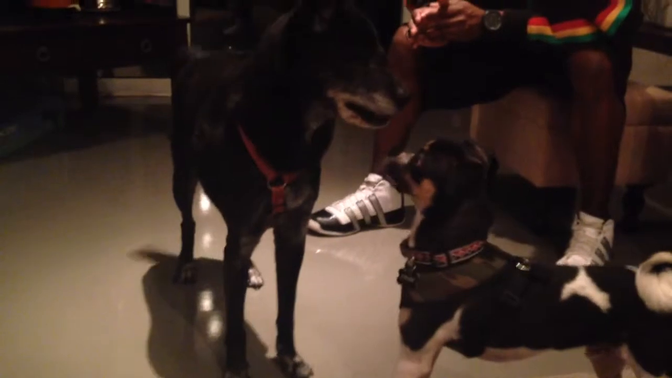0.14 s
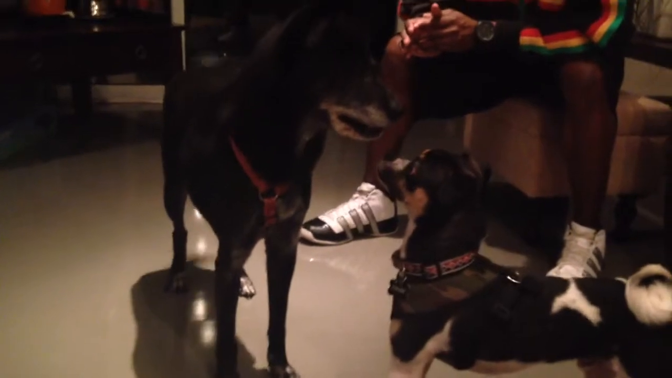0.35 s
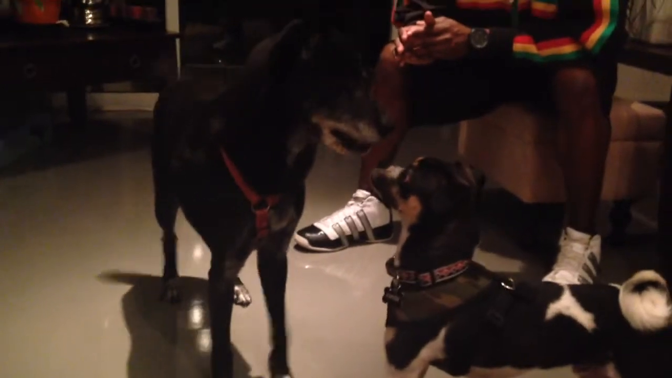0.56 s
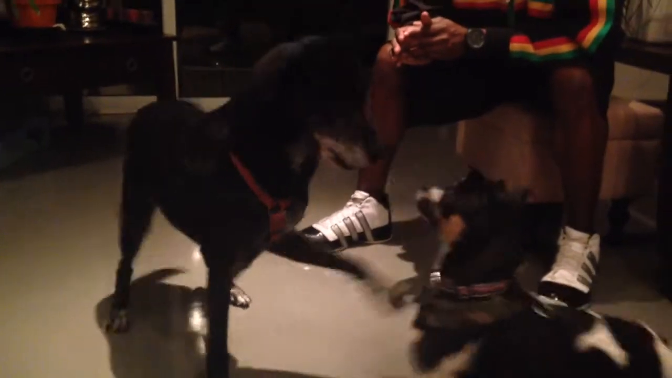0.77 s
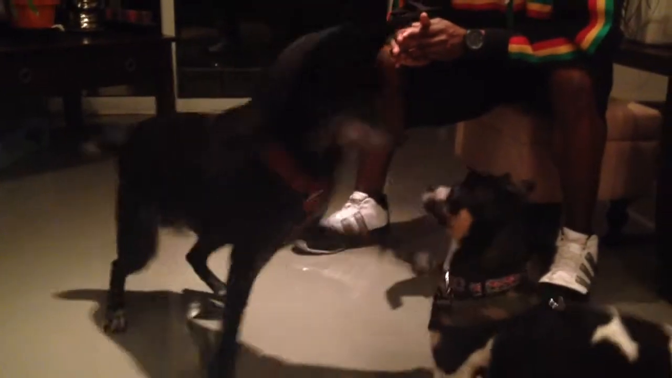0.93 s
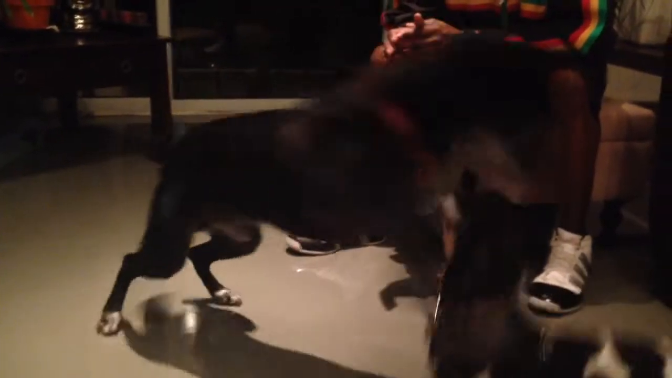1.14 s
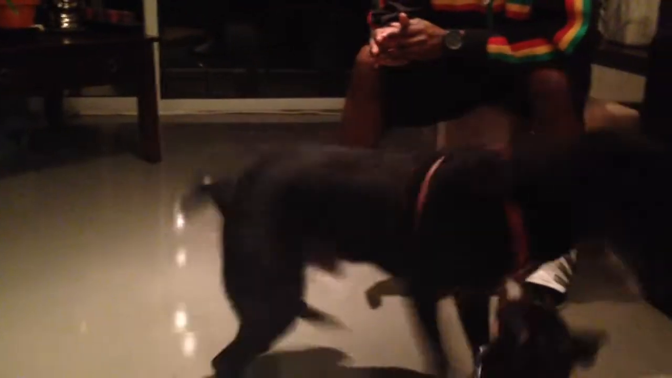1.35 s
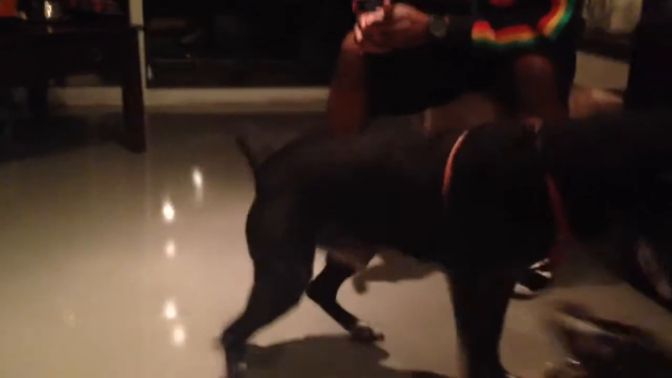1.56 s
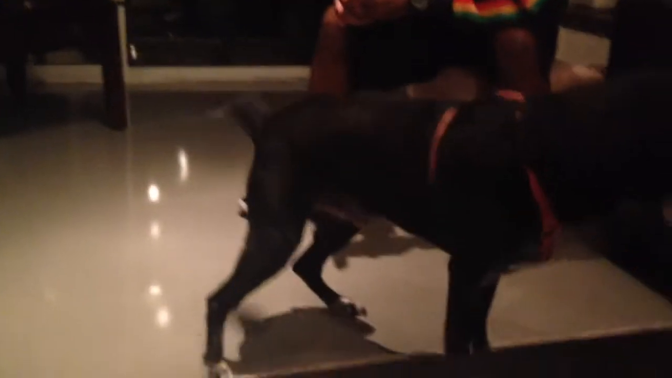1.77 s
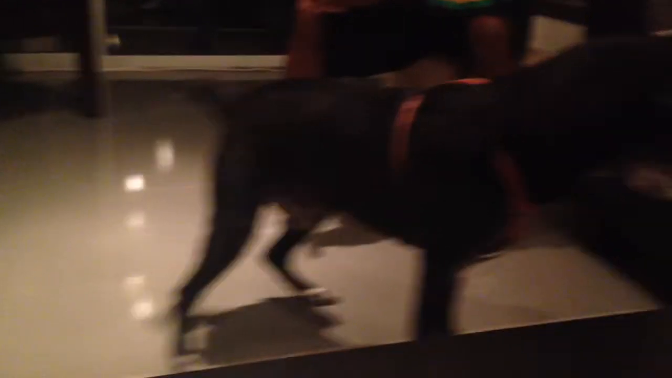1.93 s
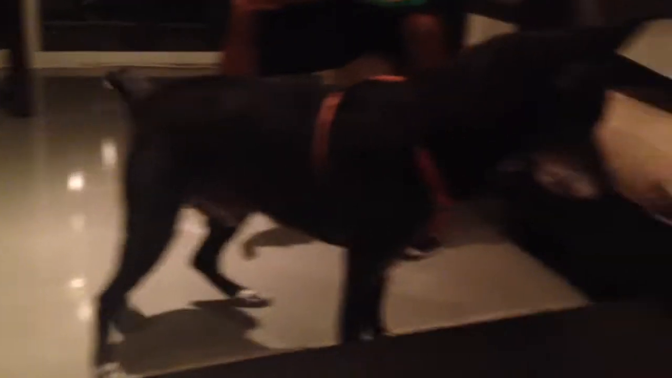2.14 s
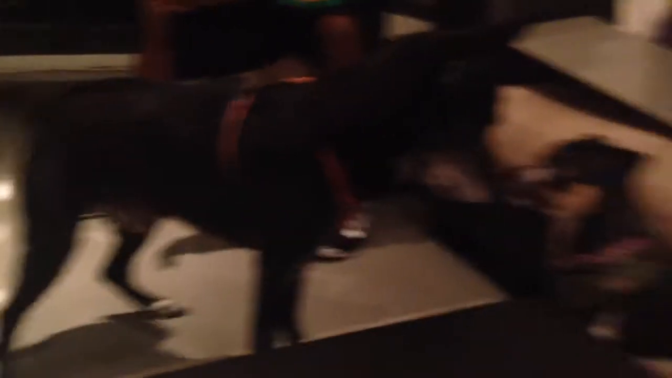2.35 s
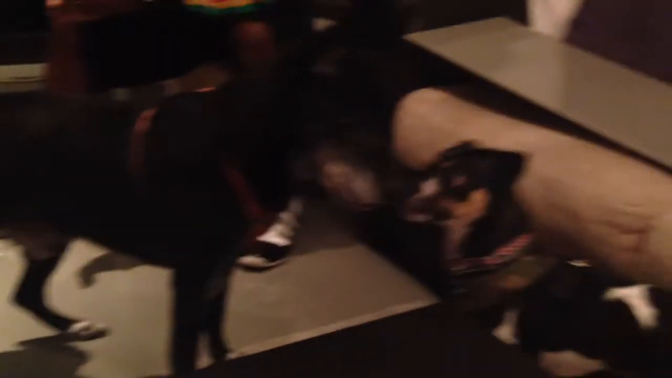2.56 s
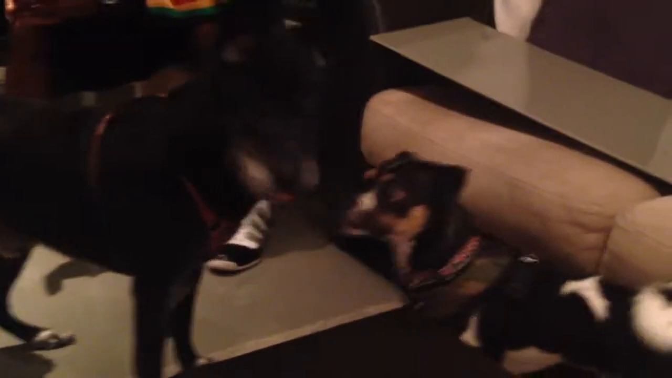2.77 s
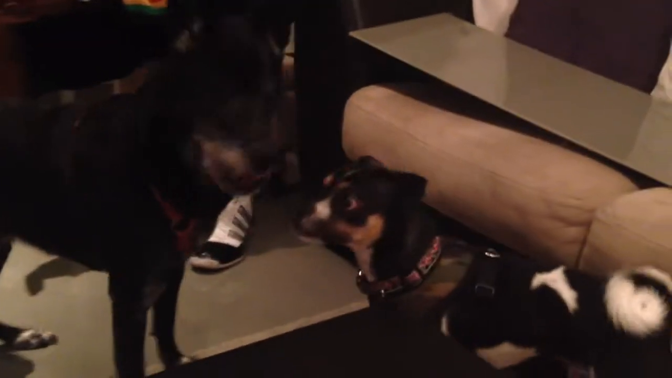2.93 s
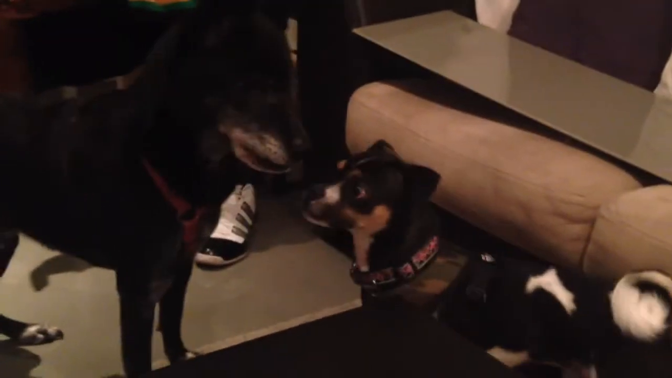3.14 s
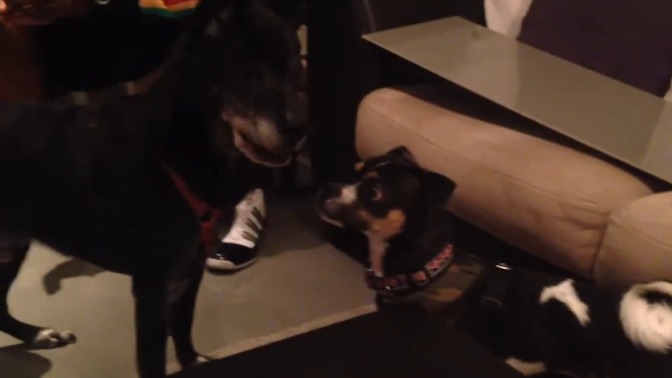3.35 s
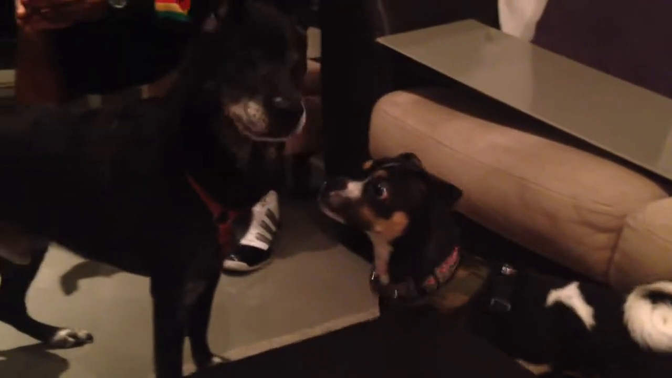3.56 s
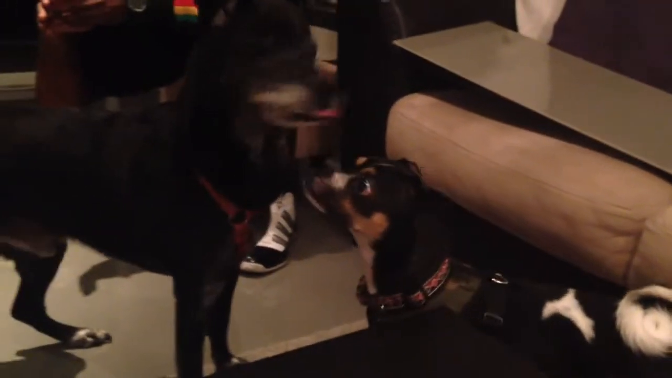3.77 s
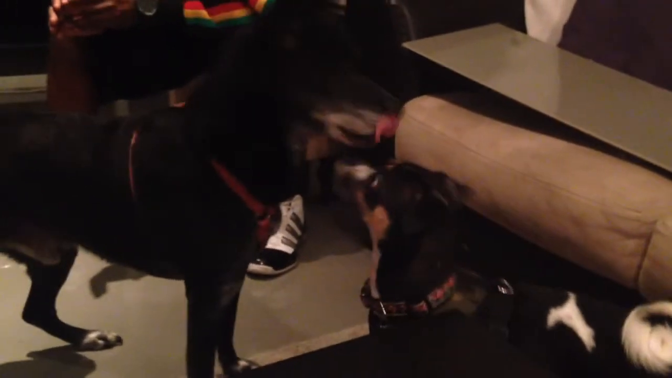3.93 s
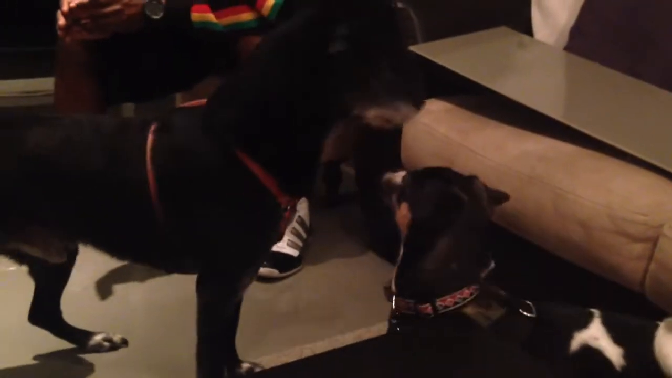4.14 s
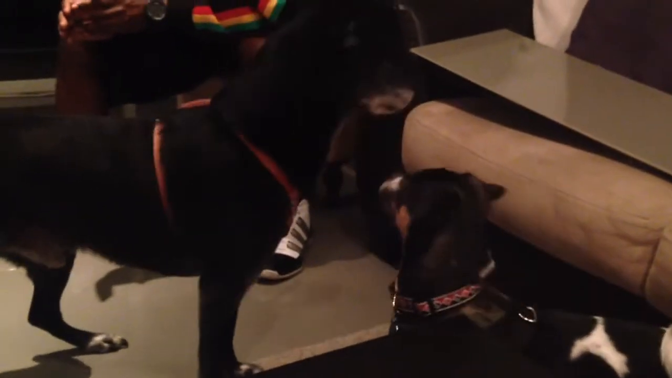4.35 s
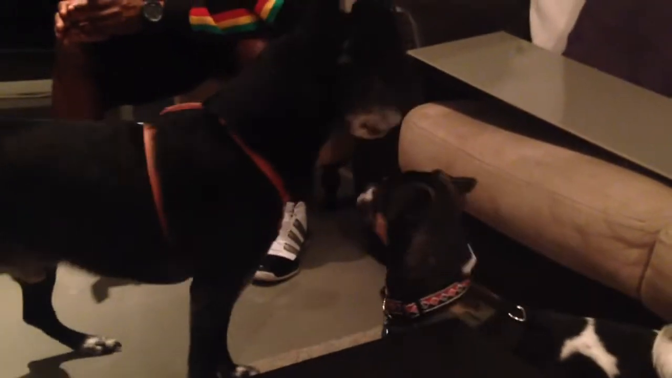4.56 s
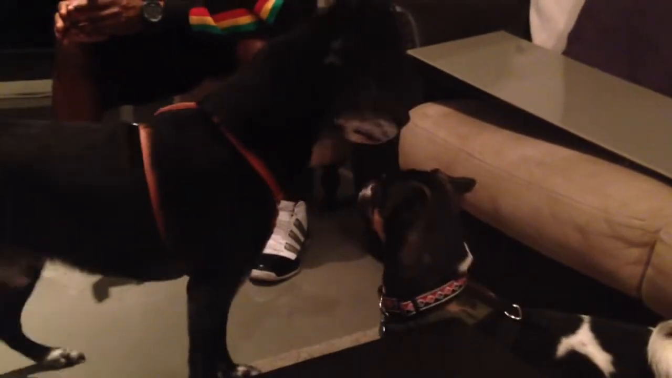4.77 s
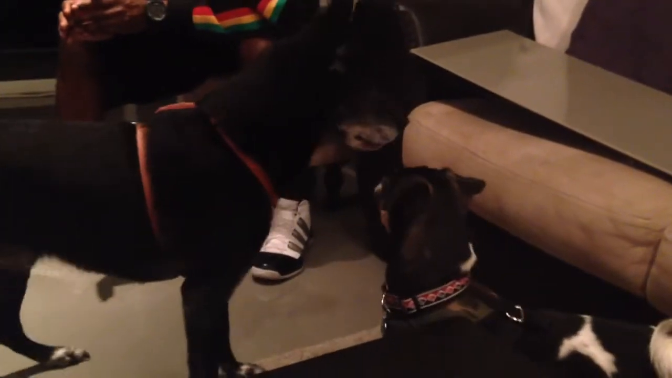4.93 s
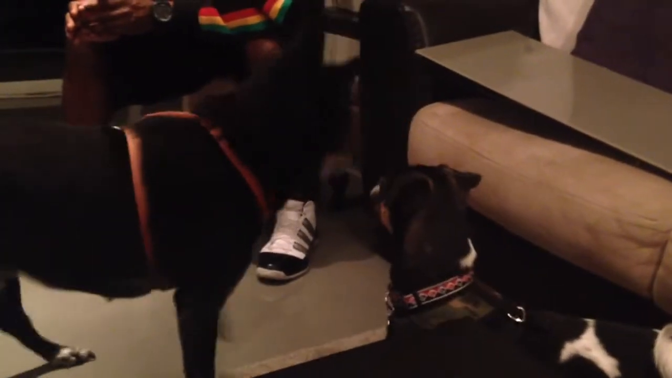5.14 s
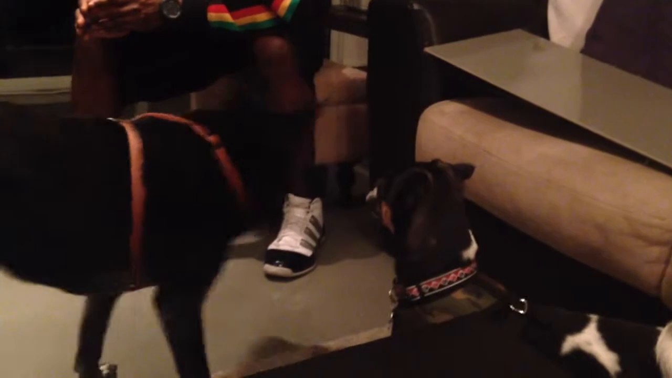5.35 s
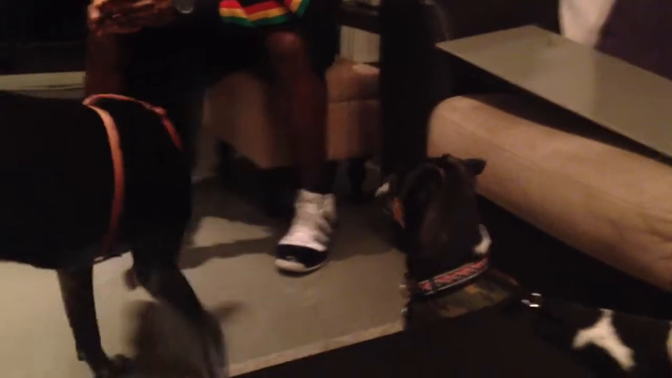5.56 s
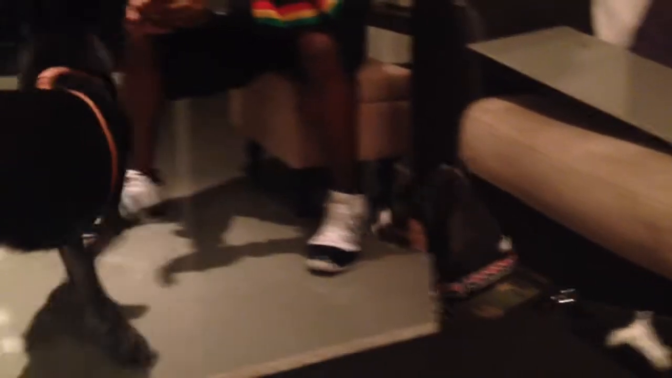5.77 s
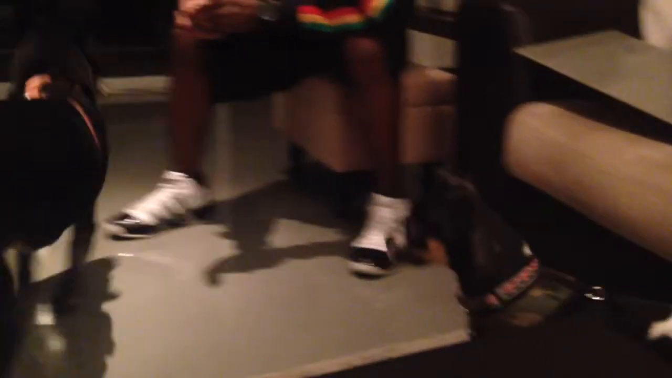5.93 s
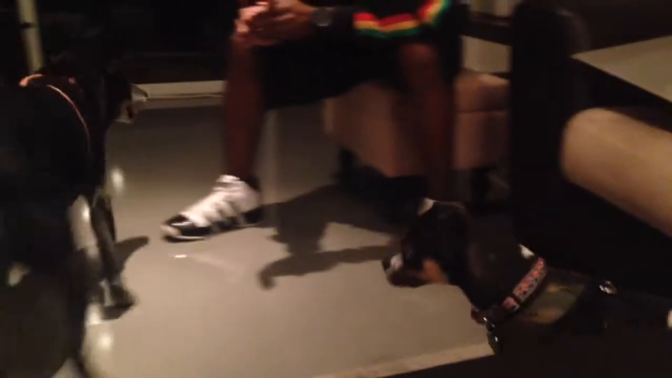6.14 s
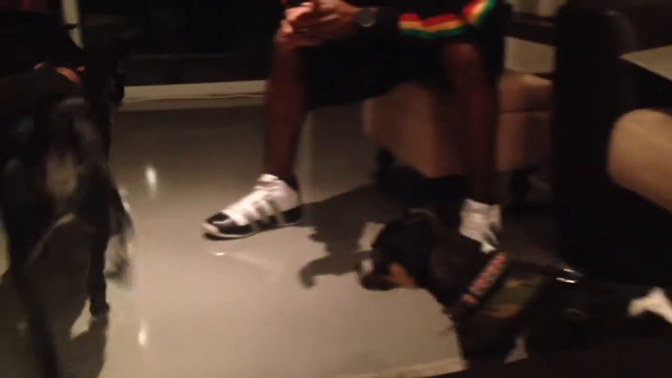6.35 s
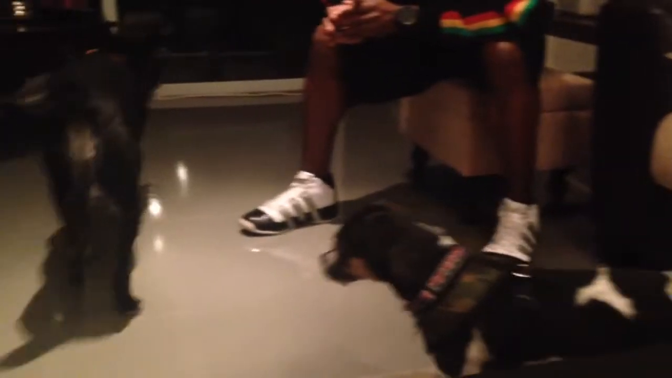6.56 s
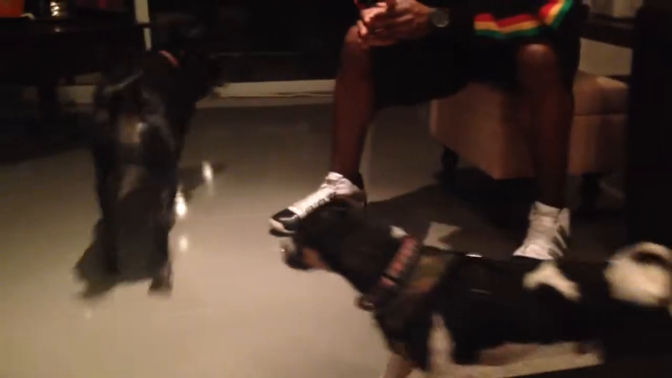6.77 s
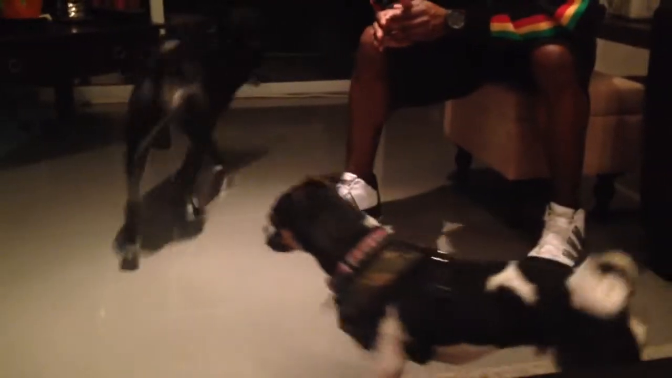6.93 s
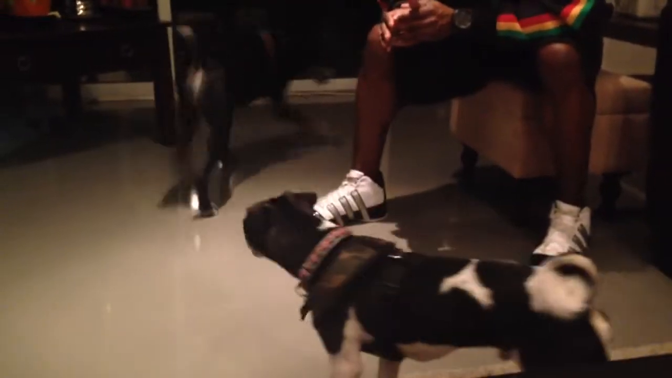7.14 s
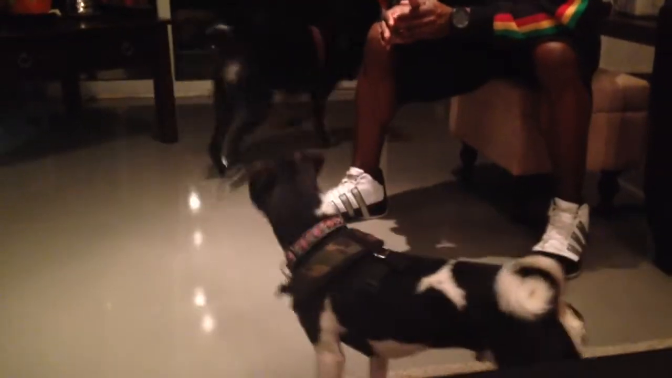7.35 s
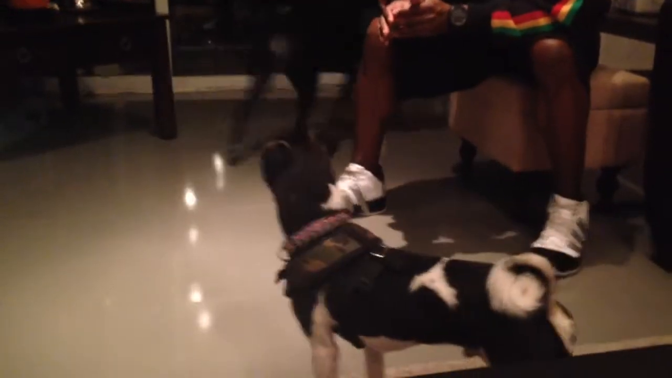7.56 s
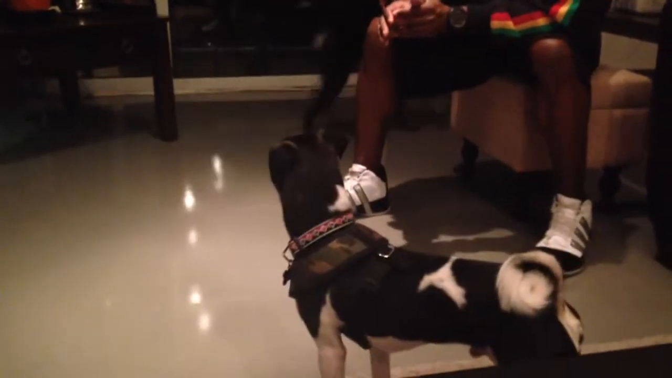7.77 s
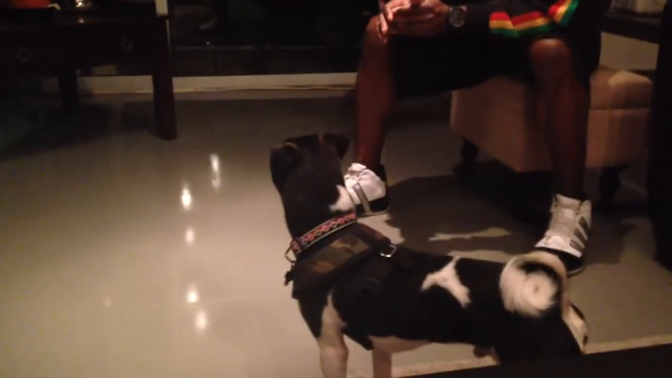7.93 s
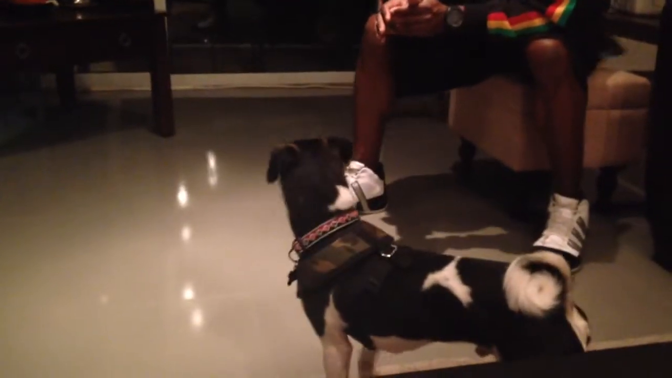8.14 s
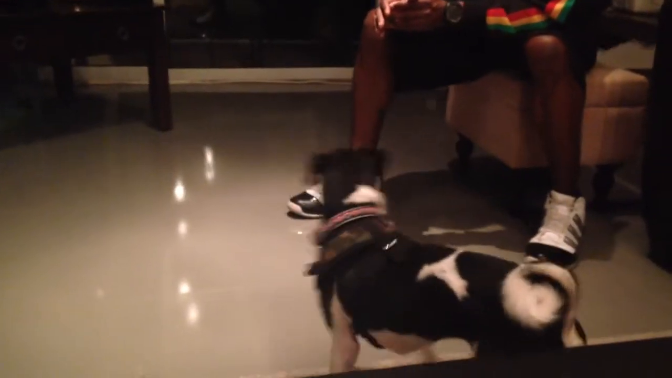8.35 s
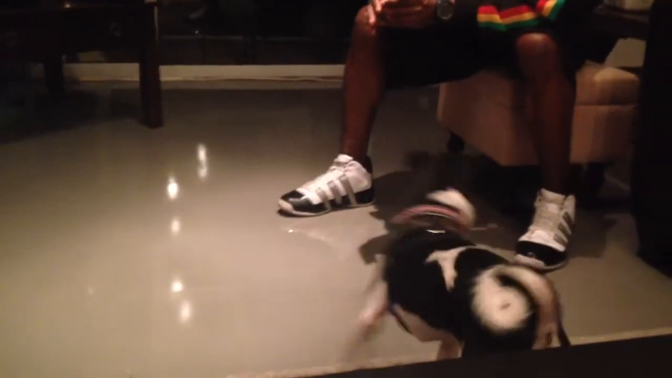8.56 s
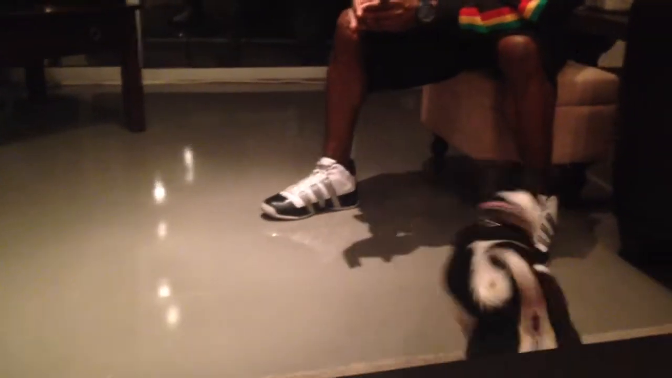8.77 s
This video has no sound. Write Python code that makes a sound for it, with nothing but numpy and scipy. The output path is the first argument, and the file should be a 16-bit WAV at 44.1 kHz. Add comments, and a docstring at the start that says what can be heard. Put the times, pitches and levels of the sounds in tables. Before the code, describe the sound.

Two dogs scuffle on a hard polished floor in an echoing room: claw clicks, low thuds, collar jingles, thin nose whines, brief hoarse huffs.

```python
"""An echoing room with a hard, polished floor, where two dogs scuffle near a hissy microphone.
Claws swell at their own pitch and tick, claws and pads skid in uneven slips, and pads thud with low bursts.
Metal modes ring in a near and a far collar, broken puffs make hoarse huffs, gliding near-pure tones
make thin nose whines, and a throbbing tone hoots. Sparse decaying reflections carry them round the room."""
import sys
import numpy as np
from scipy import signal
from scipy.io import wavfile
from scipy.ndimage import uniform_filter1d

SR = 44100
rng = np.random.default_rng(int(sys.argv[2]) if len(sys.argv) > 2 else 0)


def waveform_to_disk(signal):
    """Save audio, clipped to [-1, 1], as 16-bit WAV at the path in sys.argv[1]."""
    frames = np.transpose(np.atleast_2d(signal))
    scaled = np.clip(frames, -1, 1) * 32767
    samples = np.round(scaled).astype(np.int16)
    wavfile.write(sys.argv[1], SR, samples)


N = 388080  # samples


def gain_of(db):
    """Decibels to amplitude."""
    return 10 ** (np.asarray(db) / 20)


def evened(x):
    """Scales to rms 1."""
    return x / np.sqrt(np.mean(x ** 2) + 1e-20)


def drifting(noise, samples):
    """Smooths noise twice into a slow random drift of rms 1."""
    return evened(uniform_filter1d(uniform_filter1d(noise, samples), samples))


def read(points, hz):
    """Reads a table of (Hz, value) on a log-frequency axis."""
    f, value = np.transpose(points)
    return np.interp(np.log(hz + 1), np.log(f + 1), value)


def add(mix, s, sound):
    """Mixes a sound in at time s, in seconds."""
    part = mix[round(s * SR):][:len(sound)]
    part += sound[:len(part)]


def resonate(x, hz, width):
    """One damped resonance with a gain near 1 at its centre."""
    r = np.exp(-np.pi * width / SR)
    pole = r * np.exp(2j * np.pi * hz / SR)
    return 2 * signal.lfilter([1 - r], [1, -pole], x).real


def rasp(length, rate, resonances, taper=0.32):
    """Uneven clicks, at a given average rate per second, excite damped resonances for a short while."""
    chance, spread, sign = rng.random((3, SR // 4))[:, :round(length * SR)]
    size = gain_of(-1.3 * np.log(spread + 1e-9))
    slips = (sign - .5) * size * (chance < rate / SR)
    out = 0
    for hz, width, db in resonances:
        low_cut = signal.butter(2, 0.17 * hz, "high", fs=SR)  # thins out the low end below each resonance
        part = signal.lfilter(*low_cut, slips)
        part = resonate(resonate(part, hz, width), hz, 2 * width)
        damped_top = signal.butter(2, min(hz + 1.15 * width, .4 * SR), fs=SR)
        part = signal.lfilter(*damped_top, part)
        out = out + gain_of(db) * evened(part)
    return out * signal.windows.tukey(len(out), np.clip(taper, 0, 1))


# Hiss at the microphone. Each row: frequency in Hz, relative level in dB per Hz.
HISS_COLOUR = [(12, -41), (20, -28), (87, -1.5), (251, -6.5), (546, -4.5), (610, -6.5), (1260, -10.5),
               (1480, -10), (2190, -10.5), (2450, -8), (2660, -13.5), (3510, -9.5), (8300, -12),
               (14100, -12.5), (15300, -14)]
HISS_DB = -67.5  # rms


def hiss():
    """Microphone and room noise: coloured noise, nearly even, its level drifting a little in patches."""
    frames, hz = N // 256 + 5, np.fft.rfftfreq(1024, 1 / SR)
    real, imaginary, patches = rng.standard_normal((frames, 513, 3)).T
    patches = evened(uniform_filter1d(uniform_filter1d(patches, 14, 0), 12, 1))
    level_db = read(HISS_COLOUR, hz)[:, None] + 1.2 * patches
    spectrum = (real + 1j * imaginary) * gain_of(level_db)
    noise = signal.istft(spectrum, nperseg=1024, noverlap=768)[1][:N]
    return gain_of(HISS_DB) * evened(noise)


# How long the room rings, beneath the early boost.
# Each row: frequency in Hz, time to fall by 60 dB in seconds.
ROOM_DECAY = [(80, 0.23), (180, 0.39), (500, 0.85), (800, 0.72), (1700, 0.68), (4500, 0.58), (9000, 0.54),
              (14000, 0.23)]
ROOM_TURNS_PER_S = 3.1


def room(x, gap=.004, early_db=2.0, early_t60=0.15, uneven_db=3.0):
    """Sparse reflections, strong at first, each band dying at its own speed; three tails take turns."""
    out, turn = np.zeros(N), 2 * np.pi * ROOM_TURNS_PER_S * np.arange(N) / SR
    for k in range(3):
        taps = np.zeros(SR)
        at = np.arange(0, SR - 20, 20) + rng.integers(0, 20, (SR - 1) // 20)
        uneven = gain_of(uneven_db * rng.standard_normal(len(at)))
        taps[at] = rng.choice([-1., 1.], len(at)) * uneven
        hz, t, spectrum = signal.stft(taps, SR, nperseg=512)
        decay = gain_of(-60 * t / read(ROOM_DECAY, hz)[:, None])
        tail = signal.istft(spectrum * decay, SR, nperseg=512)[1]
        # near walls and furniture
        tail *= 1 + gain_of(early_db - 60 * np.arange(len(tail)) / SR / early_t60)
        share = np.sqrt(2 / 3) * np.cos(turn + k * np.pi / 3)  # the three powers add up to 1
        add(out, gap, signal.fftconvolve(x * share, tail / np.linalg.norm(tail))[:N])
    return out


# Hoots, one table each. Each row: time in seconds, pitch in Hz before the waver,
# level in dB before the throb and the end fades.
HOOT_CURVES = [
    [(6.586, 687, -56), (6.6, 671, -39), (6.614, 690, -39)],
    [(7.462, 754, -52), (7.485, 766, -35), (7.5, 769, -29), (7.528, 769.4, -28), (7.55, 763, -35.5),
     (7.567, 725, -44), (7.585, 770, -36), (7.605, 750, -33)],
    [(7.692, 773, -30), (7.705, 760, -23), (7.735, 751, -22), (7.752, 782, -32.5), (7.79, 749, -35),
     (7.812, 739, -53), (7.833, 727, -30.5), (7.845, 730, -48)],
]
HOOT_ROOM_DB, OVERTONES_DB = -10, -36
THROBS_PER_S, THROB_DEPTH = 37.4, 0.59  # depth as a share of amplitude


def hoots(wobble=0.017, third_db=6.5):
    """An almost pure tone that throbs evenly and wavers in pitch, with two faint partials."""
    out, drift = np.zeros(N), drifting(rng.standard_normal(N), 250)
    for rows, start in zip(HOOT_CURVES, rng.random(len(HOOT_CURVES))):
        s, hz, db = np.transpose(rows)
        t = np.arange(s[0], s[-1], 1 / SR)
        waver = 1 + wobble * drift[round(s[0] * SR):][:len(t)]
        angle = 2 * np.pi * (start + np.cumsum(np.interp(t, s, hz) * waver) / SR)
        partials = np.sin(1.94 * angle) + gain_of(third_db) * np.sin(3 * angle)
        tone = np.sin(angle) + gain_of(OVERTONES_DB) * partials
        throb = 1 - THROB_DEPTH * np.cos(np.pi * THROBS_PER_S * (t - s[0])) ** 2
        level = gain_of(np.interp(t, s, db)) * signal.windows.tukey(len(t), .1)
        add(out, s[0], level * throb * tone)
    return out, gain_of(HOOT_ROOM_DB) * out


# Whines through the nose, one table each. Each row: time in seconds, whistle pitch in Hz before
# the wobble, whistle level in dB rms before the flutter and the end fades.
WHINE_CURVES = [
    [(2.81, 6400, -73), (2.838, 6640, -57.5), (2.96, 6780, -57.5), (3.008, 7080, -64), (3.078, 7500, -59),
     (3.124, 7580, -48), (3.165, 7250, -55), (3.198, 7040, -54.5), (3.235, 6900, -65), (3.33, 6900, -72)],
    [(3.726, 5300, -68), (3.738, 5900, -63), (3.748, 6470, -71), (3.762, 6760, -60), (3.795, 6820, -68),
     (3.87, 7120, -57.5), (3.93, 7260, -62.5), (4.051, 7400, -63.5), (4.115, 7370, -68.5),
     (4.205, 6900, -70), (4.34, 6640, -79)],
    [(4.73, 6460, -77), (4.784, 6620, -70), (4.896, 6710, -69), (4.914, 6700, -61), (4.96, 6730, -71),
     (5.09, 6700, -79)],
    [(5.362, 6800, -70), (5.37, 7000, -54), (5.387, 6500, -60)],
    [(5.58, 6940, -70), (5.625, 7600, -77), (5.66, 7450, -80.5), (5.7, 7460, -71)],
]
# Air rushing with the whine. Each row: resonance in Hz, width in Hz of each of two passes,
# level in dB against the whistle when it is at the strain pitch.
RUSHING_AIR = [(4430, 950, -21), (5180, 1300, -17)]
STRAIN_HZ, STRAIN_DB_PER_KHZ = 7370, 3  # more air escapes as the whistle is pushed higher
OCTAVE_DB, WHINE_ROOM_DB = -20, -9.0


def whines(wobble=0.0033, flutter_db=1.0):
    """A nearly pure nose whistle that flutters, with a weak broken octave and some rushing air."""
    out = np.zeros(N)
    for rows in WHINE_CURVES:
        s, hz, db = np.transpose(rows)
        t = np.arange(s[0], s[-1], 1 / SR)
        pitch = np.interp(t, s, hz)
        air, jitter, flutter, breaks = rng.standard_normal((4, N // 8))
        flutter, breaks = drifting(flutter, 500)[:len(t)], drifting(breaks, 500)[:len(t)]
        jitter = evened(uniform_filter1d(jitter, 150))[:len(t)]
        angle = 2 * np.pi * np.cumsum(pitch * (1 + wobble * jitter)) / SR
        tone = gain_of(flutter_db * flutter) * np.sin(angle)
        tone += gain_of(4.6 * breaks + OCTAVE_DB) * np.sin(2 * angle)
        rush = np.zeros(len(t))
        for f, width, air_db in RUSHING_AIR:
            band = resonate(resonate(air, f, width), f, width)
            rush += gain_of(air_db) * evened(band)[:len(t)]
        rush *= gain_of(STRAIN_DB_PER_KHZ * (pitch - STRAIN_HZ) / 1000)
        level = gain_of(np.interp(t, s, db)) * signal.windows.tukey(len(t), .05)
        add(out, s[0], level * (np.sqrt(2) * tone + rush))
    return out, gain_of(WHINE_ROOM_DB) * out


# The dogs' hoarse huffs. Each row: start in seconds, length in seconds, level in dB,
# mouth opening as a factor on the throat's pitches, level of the upper two resonances in dB.
HUFF_EVENTS = [(6.147, 0.1, -71.5, 0.82, 3), (6.406, 0.045, -65, 1.08, -22), (6.612, 0.1, -55, 1.105, 3.5),
               (7.176, 0.11, -67.5, 0.92, -18), (7.413, 0.028, -65.5, 0.88, -22),
               (7.688, 0.15, -51, 0.98, 1), (7.841, 0.1, -74, 1.2, -18), (8.686, 0.15, -70.5, 1.14, 2)]
# The throat. Each row: resonance in Hz before the mouth factor, width in Hz, relative level in dB.
THROAT_RESONANCES = [(970, 580, -4), (1470, 420, 2.5), (2060, 940, 0), (2900, 3500, -0.5)]
PUFFS_PER_S, HUFF_ROOM_DB = 800, -3


def huffs():
    """Broken puffs of air through the throat, whose resonances rise as the mouth opens."""
    out = np.zeros(N)
    for s, length, db, mouth, upper_db in HUFF_EVENTS:
        throat = []
        for k, (hz, width, relative_db) in enumerate(THROAT_RESONANCES):
            throat.append((mouth * hz, width, db + relative_db + upper_db * (k > 1)))
        add(out, s, rasp(length, PUFFS_PER_S, throat, taper=0.45))
    return out, gain_of(HUFF_ROOM_DB) * out


# Levels of the collar tags hold before the brushing makes them ragged.
# Far collar. Each row: strike in seconds, level in dB, level of the second mode group in dB.
FAR_COLLAR_STRIKES = [(5.7144, -52, -9), (5.7394, -57.5, -9), (5.7972, -61.5, -4), (6.3121, -49.5, -17),
                      (7.1272, -58, 5), (7.1894, -50, -9), (7.4144, -52, -6), (7.428, -53.5, 1),
                      (7.7468, -41.5, -22), (7.7583, -36.5, -16), (7.8226, -43.5, -23), (7.8494, -50, -20)]
# Its mode groups, main then high. Each row: pitch in Hz, level in dB, time to fall 60 dB in seconds.
FAR_COLLAR_MODES = [
    [(6240, -16, 0.092), (6400, -5, 0.098)],
    [(7570, -7.5, 0.18), (7940, -5.5, 0.041)],
]
# Near collar. Each row: strike in seconds, level in dB, high group in dB, low group in dB.
NEAR_COLLAR_STRIKES = [(1.4427, -42, -17, -10), (1.4656, -53, -4.5, -5.5), (1.4833, -43, -4.5, 11),
                       (1.5244, -44, 10.5, 5), (1.5442, -46, 2, 3), (1.8956, -58, -3, 16),
                       (1.9144, -58, -1, 13), (2.0358, -35.5, -10, -24), (2.0644, -47, -11, -8),
                       (2.0713, -52, -6, -7), (2.0995, -62, -6, -10)]
# Its mode groups, main, high, low. Each row: pitch in Hz, level in dB, time to fall 60 dB in seconds.
NEAR_COLLAR_MODES = [
    [(3220, -22, 0.073), (9840, 1.5, 0.034), (10120, -14, 0.054)],
    [(11460, 4.5, 0.027), (11600, -17, 0.03), (14480, -10, 0.041)],
    [(3530, -11.5, 0.054), (6000, -4, 0.033)],
]


def tags(strikes, groups, room_db, tick_db=-8.0, tick_hz=8000, tick_s=0.00024):
    """Struck metal: a tick, and groups of modes whose strength depends on where the blow lands."""
    out, t = np.zeros(N), np.arange(SR // 2) / SR
    tick = (np.exp(-(t / tick_s - 2) ** 2) * np.sin(2 * np.pi * tick_hz * t))[:100]
    phases = rng.random((len(strikes), len(groups), 3))  # in turns
    for (s, db, *place), strike_phases in zip(strikes, phases):
        add(out, s, gain_of(db + tick_db) * tick)
        for modes, place_db, group_phases in zip(groups, [0, *place], strike_phases):
            for (hz, mode_db, t60), phase in zip(modes, group_phases):
                level = gain_of(db + mode_db + place_db - 60 * t / t60)
                add(out, s, level * np.sin(2 * np.pi * (hz * t + phase)))
    touch = drifting(rng.standard_normal(N), 120)
    out *= gain_of(6.1 * touch - 2.0)  # the tags brush each other, so the ring is ragged
    return out, gain_of(room_db) * out


# Paws sliding, and brief smeared claw clicks; the narrow ones squeak. Each row: start in seconds,
# length in seconds, level in dB rms before the end fades, scrape pitch in Hz, width in Hz.
SKID_EVENTS = [(1.237, 0.019, -47.5, 2830, 4880), (1.258, 0.007, -28, 4260, 2380),
               (1.269, 0.059, -53, 1600, 1480), (1.378, 0.058, -53.5, 5800, 6000),
               (1.393, 0.011, -43.5, 7700, 4000), (1.494, 0.0107, -35.5, 4050, 5170),
               (1.523, 0.031, -49, 3770, 4140), (1.587, 0.047, -54.5, 840, 265),
               (5.407, 0.049, -60, 2000, 1200), (5.421, 0.025, -42.5, 4500, 3900),
               (5.454, 0.022, -48, 4130, 2470), (5.865, 0.026, -61, 4070, 2980),
               (5.977, 0.005, -39.5, 4750, 3240), (6.609, 0.04, -50.5, 6160, 250),
               (6.617, 0.041, -56.5, 6780, 300), (6.789, 0.052, -79, 4500, 3500),
               (7.173, 0.022, -54.5, 2250, 304), (7.303, 0.11, -61, 4270, 2450),
               (7.967, 0.011, -46, 6750, 4840), (8.608, 0.022, -47, 5060, 3800)]
SKID_ROOM_DB = 1.5  # for skids of 30 ms and longer
SLIPS_PER_S, EXTRA_SLIPS = 500, 18  # a steady scrape; about this many more per skid, so brief ones are denser


def skids():
    """Uneven slips of claw and pad excite one scraping resonance; the briefest are heard mostly direct."""
    dry, wet = np.zeros((2, N))
    for s, length, db, hz, width in SKID_EVENTS:
        scrape = rasp(length, SLIPS_PER_S + EXTRA_SLIPS / length, [(hz, width, db)])
        add(dry, s, scrape)
        add(wet, s, gain_of(SKID_ROOM_DB) * min(length / .03, 1) * scrape)
    return dry, wet


# Pads and bodies landing. Each row: time in seconds, to which a short lag is added, level in dB,
# ring in Hz, room level in dB against the direct sound, knock level in dB against the thud.
THUD_EVENTS = [(0.449, -69, 640, 9, -17), (0.512, -62, 580, -4, -15), (0.691, -58, 592, 2.5, 2),
               (0.782, -42, 510, -0.5, -4), (1.043, -62, 510, -2, -5.5), (1.309, -44, 510, -0.5, -17),
               (1.357, -39, 410, 2, 1.5), (1.387, -23.5, 440, -4, -4), (1.389, -44, 140, -3, -20),
               (1.401, -35, 364, -1, -17), (1.492, -39, 502, 9.5, -12), (1.565, -23.5, 204, -3, -1),
               (1.59, -42, 180, -9, -15), (1.609, -32, 207, -7.5, -3), (1.739, -33.5, 189, -0.5, -5),
               (1.765, -41, 178, -4, -9.5), (1.828, -43, 219, -17, -16), (1.85, -52, 200, 3, -15),
               (2.453, -50.5, 1150, 0, -4), (2.902, -60, 513, 1, 13), (3.362, -60.5, 494, -3, 11),
               (3.802, -56, 790, -5, -15), (3.998, -64, 603, -10, -9), (4.125, -53.5, 943, -1.5, -15),
               (4.509, -57.5, 885, 3, -9), (4.764, -60, 500, 6, -1.5), (5.147, -60.5, 580, 2, -12),
               (5.341, -60.5, 800, -4, -12), (5.387, -39, 593, 2.5, -20), (5.405, -49, 274, 0, -19),
               (5.443, -40.5, 560, -3, -15), (5.652, -50, 484, 2, -8), (5.855, -51.5, 594, 1.5, -15),
               (5.947, -44, 506, 2, -12), (6.229, -42.5, 580, -0.5, -10), (6.244, -42, 594, -7.5, -15),
               (6.291, -54, 510, 1, -5.5), (6.47, -54, 410, 2, -6), (6.533, -61.5, 586, 8.5, -5.5),
               (6.759, -50, 540, 4, -14), (7.019, -49, 477, 11, -12), (7.046, -46.5, 483, -1, 8.5),
               (7.299, -50.5, 587, 0, -14), (7.311, -42, 520, -2, -14), (7.628, -44, 560, 9, -2),
               (8.241, -58.5, 390, 10, -9), (8.264, -41.5, 550, 0.5, 1.5), (8.57, -62, 554, 14.5, -17),
               (8.756, -59.5, 475, 5, 7.5)]
LONGEST_SQUASH_S, KNOCK_S, KNOCK_HZ = 0.0018, 0.00079, 705  # times to the envelope's peak


def thuds(lag=0.002025, soft=1.64):
    """A pad squashes, then pushes the floor for a cycle or two; bone and claw add a shorter knock above."""
    dry, wet, t = *np.zeros((2, N)), np.arange(3000) / SR
    knock_swell = (t / KNOCK_S * np.exp(1 - t / KNOCK_S)) ** soft
    knock = knock_swell * np.sin(2 * np.pi * KNOCK_HZ * t)
    for s, db, hz, room_db, knock_db in THUD_EVENTS:
        u = t / min(LONGEST_SQUASH_S, 1 / hz)
        push = (u * np.exp(1 - u)) ** soft * np.sin(2 * np.pi * hz * t)
        blow = push + gain_of(knock_db) * knock
        blow = signal.lfilter(*signal.butter(2, .4 * hz, "high", fs=SR), blow)  # the floor springs back
        add(dry, s + lag, gain_of(db) * blow)
        add(wet, s + lag, gain_of(db + room_db) * blow)
    return dry, wet


# Claw taps, near and far. Each row: start of the swell in seconds, level in dB, ring in Hz,
# room level in dB against the direct tick.
CLAW_TAPS = [(0.6736, -41.5, 4160, 13), (0.7868, -27, 4550, 3), (0.963, -48, 5300, -5),
             (1.242, -33, 3300, 3), (1.259, -12, 4760, 1.5), (1.2605, -16, 3290, -11),
             (1.3857, -37, 3970, 16), (1.494, -23, 4260, 12), (1.5662, -30.5, 2750, 1),
             (1.6724, -36.5, 3740, 9.5), (2.448, -46, 4400, 2), (3.114, -42, 5040, 0),
             (3.1892, -43, 5330, 4), (3.46, -40, 4080, 4), (3.4794, -43, 4030, -8), (4.0542, -50, 4200, 5),
             (4.7994, -46.5, 4520, 8.5), (5.3885, -19, 6180, 9), (5.3921, -27, 4540, 13.5),
             (5.6535, -44, 4430, 11.5), (5.8218, -44, 3760, 13), (5.8585, -38.5, 3640, 14.5),
             (5.8777, -38, 3700, 8), (5.9777, -20.5, 4650, 4.5), (6.2173, -43, 4340, 11),
             (6.291, -45, 4240, 11.5), (6.3663, -32, 4950, 3.5), (6.3824, -36.5, 6700, 4),
             (6.5293, -37, 4600, 9), (6.572, -36.5, 3960, 10), (6.7174, -47, 5140, 19),
             (6.732, -29, 4300, 6.5), (6.768, -29, 5890, 7.5), (6.779, -34, 5600, 1),
             (6.807, -34, 7700, -3), (6.982, -35, 5670, 6.5), (7.017, -36.5, 4220, 7),
             (7.0432, -11.5, 5120, 3.5), (7.3002, -47.5, 4770, 6), (7.3492, -41, 4310, 0),
             (7.3656, -39.5, 4000, 14), (7.3836, -37.5, 6300, 7.5), (7.5937, -41, 3870, 8.5),
             (7.6245, -20.5, 4800, 9), (7.9079, -47, 6460, 20), (7.9547, -26.5, 3820, 9),
             (8.2017, -47, 4090, 9), (8.2559, -23.5, 4220, 14), (8.2594, -25, 4170, 2.5),
             (8.5757, -44, 3670, 11), (8.5883, -38, 4280, 12)]
# The floor's colour on a tap. Each row: frequency in Hz, relative level in dB per Hz.
TICK_COLOUR = [(530, -38.5), (900, -24.5), (1720, -18), (1890, -17.5), (2940, -16.5), (4210, -6),
               (8030, -14.5), (13400, -25.5), (14600, -37), (15700, -21)]
# Faint stray taps while the dogs move. Each row: from and to, in seconds.
PATTER_SPANS = [(0.95, 1.8), (2.3, 2.5), (5.4, 7.6)]
CLAW_CYCLES, CLAW_SHARPNESS = 1.9, 0.8  # build-up of a tap; share of treble in its tick
PATTER_PER_S, PATTER_ROOM_DB = 4, 13.5
PATTER_FAINTEST_DB, PATTER_SPREAD_DB, PATTER_HZ = -53.5, 8, 4650  # each tap at 0.8 to 1.3 of this pitch


def stray_taps():
    """Scatters faint taps of random level and pitch over the spans of movement, as rows like the claw taps."""
    when, luck, size, pitch = rng.random((200, 4)).T
    when = when * N / SR
    inside = sum((when > a) & (when < b) for a, b in PATTER_SPANS) > 0
    kept = inside & (luck < PATTER_PER_S * N / SR / len(luck))
    db = PATTER_FAINTEST_DB + PATTER_SPREAD_DB * size
    hz = PATTER_HZ * (.8 + .5 * pitch)
    return np.transpose([when, db, hz, np.full(len(when), PATTER_ROOM_DB)])[kept]


def claws():
    """Each tap swells for a few cycles at the claw's own pitch and lets go with a tick coloured by the floor."""
    log_gain = np.log(gain_of(read(TICK_COLOUR, abs(np.fft.fftfreq(2048, 1 / SR)))))
    # minimum phase: the tick's energy comes at once
    tick = np.fft.ifft(np.exp(log_gain - 1j * signal.hilbert(log_gain).imag)).real[:400]
    tick, t = tick / abs(tick).max(), np.arange(400) / SR
    dull = signal.lfilter(*signal.butter(2, 7000, fs=SR), tick)
    tick = dull + CLAW_SHARPNESS * (tick - dull)
    dry, wet = np.zeros((2, N))
    for s, db, hz, room_db in [*CLAW_TAPS, *stray_taps()]:
        u = t * hz / CLAW_CYCLES
        ring = gain_of(db) * (u * np.exp(1 - u)) ** 0.52 * np.sin(2 * np.pi * hz * t)
        add(dry, s, 0.5 * ring)
        add(dry, s + CLAW_CYCLES / hz, gain_of(db) * tick)
        add(wet, s, gain_of(room_db) * (0.04 * ring + gain_of(db) * tick))
    return dry, wet


def scene():
    """Every source reaches the microphone directly and through the room, over the hiss."""
    far = tags(FAR_COLLAR_STRIKES, FAR_COLLAR_MODES, room_db=3.5)
    near = tags(NEAR_COLLAR_STRIKES, NEAR_COLLAR_MODES, room_db=-5.0)
    parts = [hoots(), whines(), huffs(), far, near, skids(), thuds(), claws()]
    direct, to_room = np.sum(parts, axis=0)
    return (direct + room(to_room) + hiss())[None]


def record(dry):
    """Limits the band: a steep low-pass takes away the top treble."""
    low_pass = signal.firwin(511, 15500, window=("kaiser", 9), fs=SR)  # edge in Hz
    return signal.oaconvolve(dry, low_pass[None], "same")


dry = scene()
out = record(dry)
waveform_to_disk(out)
```